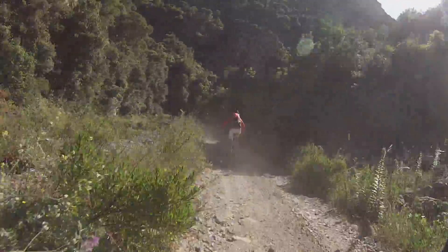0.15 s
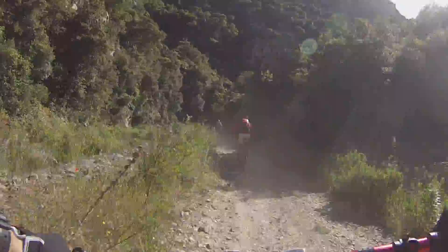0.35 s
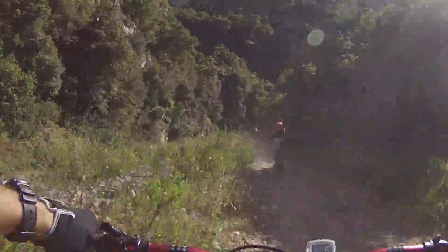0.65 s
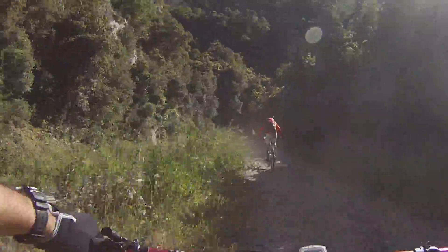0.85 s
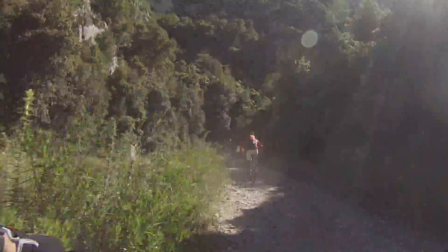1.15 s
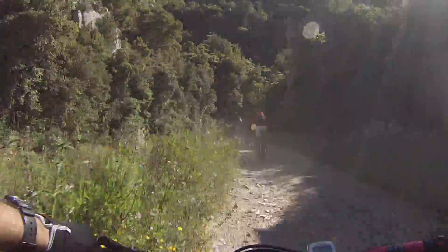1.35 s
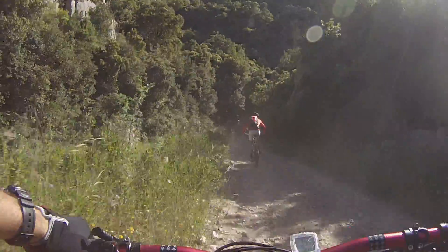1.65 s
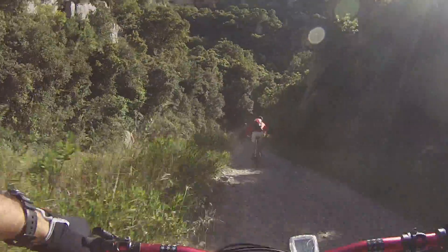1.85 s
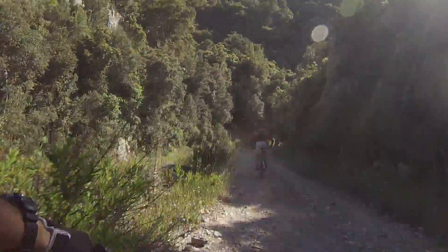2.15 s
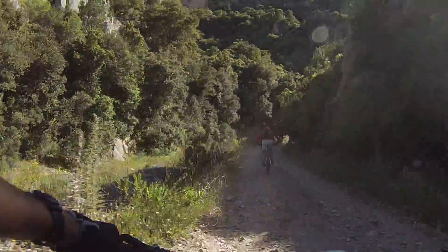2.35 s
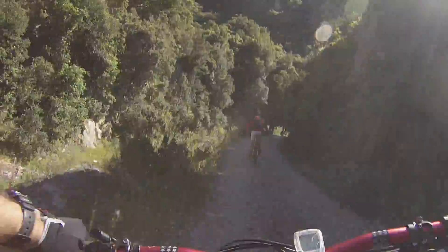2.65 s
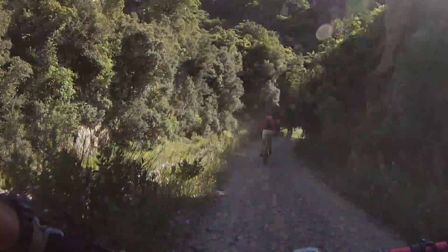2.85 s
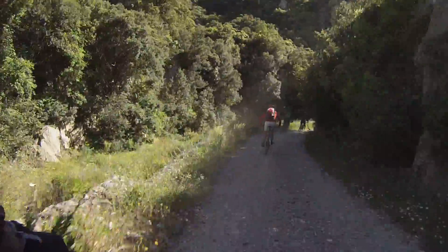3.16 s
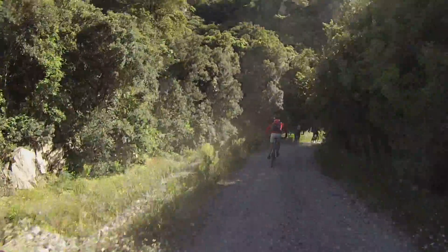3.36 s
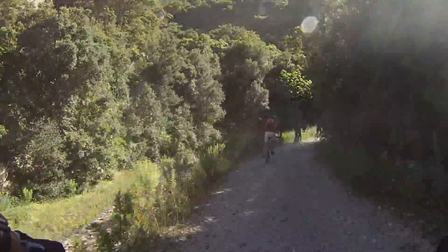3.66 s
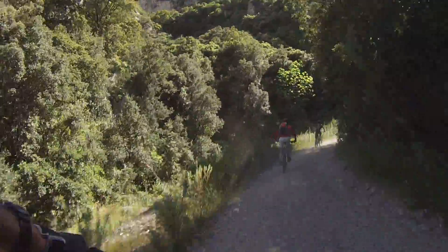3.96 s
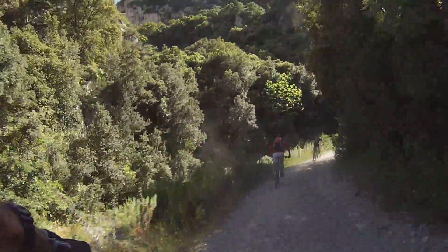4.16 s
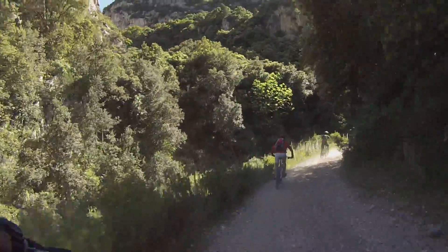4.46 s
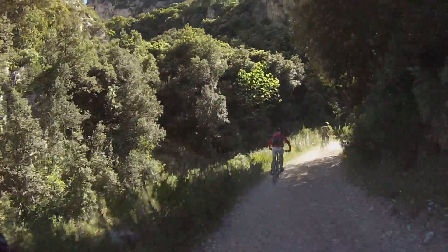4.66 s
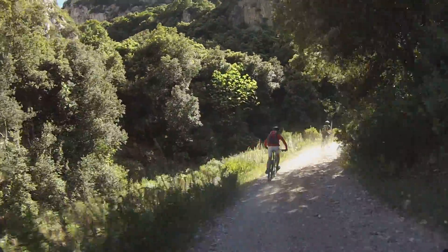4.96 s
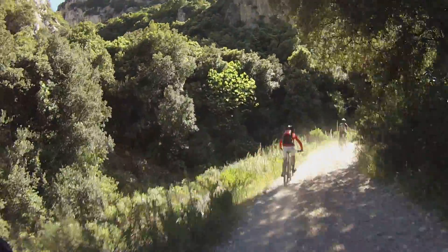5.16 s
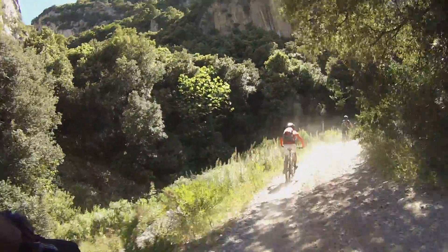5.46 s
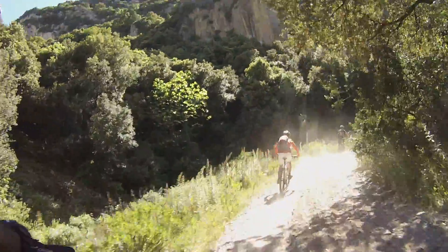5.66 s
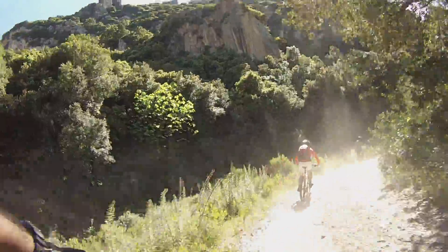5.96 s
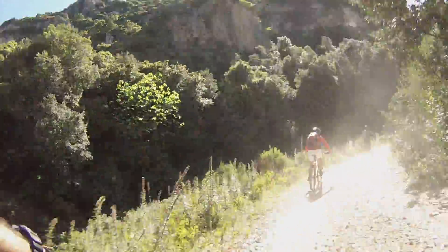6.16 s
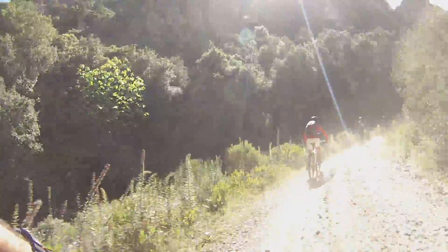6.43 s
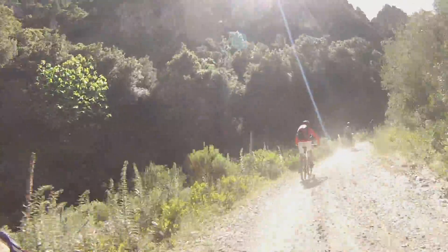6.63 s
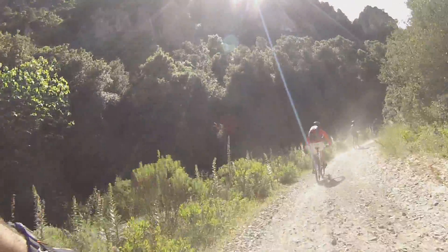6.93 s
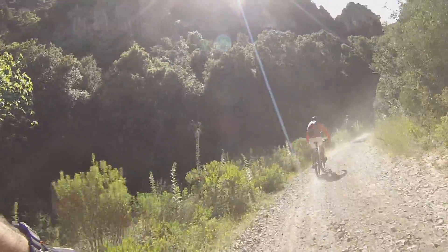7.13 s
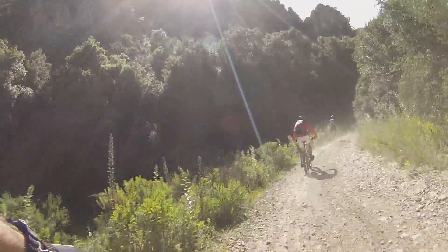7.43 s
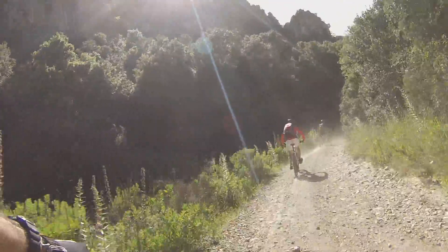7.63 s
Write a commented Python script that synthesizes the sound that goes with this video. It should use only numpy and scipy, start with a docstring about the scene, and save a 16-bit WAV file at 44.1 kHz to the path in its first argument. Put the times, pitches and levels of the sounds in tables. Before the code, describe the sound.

A mountain bike rolls down a dry gravel track for nearly eight seconds, heard in mono by a small, plastic-cased camera on the rider. Tyre crunch is continuous, grainy and boxy, with subdued fine grit on top. Very low wind buffets the microphone in uneven puffs and sudden pressure thuds, heaviest until about 3 s. A hard stone strike lands at 0.3 s and another at 1.05 s with a knock. Rattles and hollow knocks crowd 1.1-2.7 s, then continue around 3-4 s, with a sharp stone click near 4.0 s and a dull thump at 4.6 s. Lighter clicks follow at 5.2-5.4 s. From 6 s the crunch thins, with isolated stone hits at 6.4 and 6.9 s. Wind thuds return near 7.5 s, and a flurry from 7.3 to 7.8 s includes the loudest crack at 7.45 s. Barely audible, thin high chirps pass at 2.85, 5.45 and 6.55 s.

```python
"""Mountain bike on loose gravel

A bike rolls downhill, heard by a small camera in a plastic housing on the rider. Shaped noise makes wind at
the microphone port; hiss and noise grains ring the housing as tyre crunch. Noise bursts through resonances
make rattles, knocks, tyre thumps and stones on the frame; paired falling sines make a thin chirp now and then.
"""
import sys
import numpy as np
from scipy import signal
from scipy.fft import rfft, irfft, next_fast_len
from scipy.io import wavfile
from scipy.ndimage import uniform_filter1d

SR = 44100
rng = np.random.default_rng(int(sys.argv[2]) if len(sys.argv) > 2 else 0)


def to_wav(s):
    """Save 16-bit WAV."""
    ch = np.atleast_2d(s).T  # columns
    pcm = np.round(np.clip(ch, -1, 1) * 32767)  # PCM
    wavfile.write(sys.argv[1], SR, pcm.astype(np.int16))


N = 343539
BLOCK = 2 ** 12  # samples given to one blow, and to each side of a pressure drop

# wind on the port, before flicker: t/s, buffet level/dB, rumble level/dB
WIND_CURVE = [(0.0, -37, -37), (0.04, -20.5, -45.5), (0.15, -42, -41), (0.19, -23, -36),
              (0.43, -33.5, -44.5), (0.54, -18.5, -42), (0.82, -33.5, -42), (0.86, -23.5, -43),
              (1.04, -33.5, -41.5), (1.17, -24.5, -38.5), (1.32, -27, -45), (1.36, -38, -38.5),
              (1.43, -26.5, -38.5), (1.67, -30, -36.5), (1.73, -27, -42.5), (1.99, -27, -38),
              (2.01, -24.5, -29), (2.1, -30, -46.5), (2.29, -23.5, -40), (2.38, -37, -45),
              (2.44, -25.5, -36.5), (2.68, -26.5, -37), (2.75, -30, -45), (2.83, -28, -41.5),
              (3.31, -26, -39), (3.33, -35.5, -35), (3.59, -26, -41), (3.79, -38, -47), (4.05, -27, -41),
              (4.37, -35, -41.5), (4.65, -27.5, -41), (4.76, -35, -45), (5.13, -32.5, -44),
              (5.22, -25.5, -47), (5.28, -38.5, -41.5), (5.41, -23, -38.5), (5.52, -33, -41),
              (5.6, -25, -42.5), (5.97, -34, -46.5), (7.12, -40.5, -45.5), (7.51, -26, -46.5),
              (7.57, -43, -44.5), (7.64, -25.5, -47.5), (7.77, -34.5, -43)]
# spectral shape of the slow pressure swings: f/Hz, relative level/dB
BUFFET_COLOUR = [(4.7, -31), (8, 9), (14, 1), (26, 2.5), (45, -17), (70, -33), (130, -91)]
# spectral shape of the small eddies: f/Hz, relative level/dB
RUMBLE_COLOUR = [(30, -39), (55, -2), (120, -10), (250, -22.5), (500, -33), (900, -45.5), (1500, -92)]
# sudden pressure drops as an eddy crosses the port: t/s, level of the pointed part/dB
PRESSURE_DROPS = [(0.19, -9), (0.327, -10.5), (0.562, -15), (0.63, -8.5), (1.178, -8.5), (1.641, -12.5),
                  (2.025, -7), (2.291, -12), (2.579, -9), (2.669, -11.5), (3.013, -19), (3.102, -17),
                  (3.291, -14.5), (5.207, -14.5), (5.593, -13.5), (5.667, -13.5), (5.814, -16.5),
                  (7.453, -15), (7.513, -12)]
# tyres on gravel: t/s, crunch level/dB, fine grit level/dB
ROLL_CURVE = [(0.0, -50, -61), (0.11, -44.5, -56.5), (0.28, -46, -56), (0.82, -47, -58.5),
              (1.21, -46.5, -58.5), (1.4, -46.5, -59), (2.27, -47, -58.5), (2.51, -44.5, -55.5),
              (2.68, -46, -56), (2.88, -46.5, -58.5), (3.24, -44, -56), (3.48, -45, -57.5),
              (3.81, -48, -60), (4.09, -45, -57), (4.28, -47.5, -59), (4.65, -45, -57), (4.85, -46, -58.5),
              (5.13, -47.5, -58.5), (5.45, -44.5, -57.5), (5.6, -47, -57.5), (5.91, -48.5, -58.5),
              (6.19, -51, -60.5), (7.23, -51.5, -60.5), (7.77, -49, -61)]
# grain sizes: centre f/Hz, mean strikes/s, level before the band filter/dB
GRAIN_SIZES = [(354, 90, -6), (725, 120, -11), (1230, 250, -4.5), (1500, 260, -4.5), (2060, 220, -5),
               (2300, 280, -9.5), (2760, 280, -3.5), (3900, 330, -8), (5600, 240, -9), (8100, 280, -6.5),
               (12000, 100, -18)]
# broad colour of the housing: f/Hz, gain/dB
SHELL_COLOUR = [(60, -21), (150, -2), (300, -4), (550, -0.5), (800, -5.5), (1100, -4.5), (1900, -8),
                (2800, -19), (3300, -20), (4500, -23), (6000, -27), (9000, -30), (12000, -37.5),
                (13500, -39), (15000, -44)]
# housing resonances, added as power to the broad colour: f/Hz, width/Hz, gain/dB
HOUSING_RINGS = [(1263, 49, 5), (1524, 197, 2.5), (2123, 91, -1), (2336, 286, 1.5), (2717, 125, -8),
                 (3580, 890, -16.5), (5010, 30, -12), (5205, 65, -10.5), (5390, 540, -21.5),
                 (6660, 220, -27), (11370, 580, -33)]
# sprays of grit and chain rattle: t/s, peak level/dB, centre f/Hz, decay constant/ms
RATTLE_EVENTS = [(0.1367, -41.5, 5100, 11), (0.422, -45, 5040, 5), (0.4346, -39, 6000, 4.6),
                 (0.775, -54, 5220, 5), (1.222, -38, 4200, 5.5), (1.2695, -34, 4980, 5.4),
                 (1.2838, -36, 5160, 3.1), (1.7974, -39.5, 4600, 4.3), (1.9169, -41, 4970, 10),
                 (2.255, -42, 5440, 5), (2.562, -32, 4000, 5.2), (2.604, -40, 4200, 5),
                 (2.6543, -37, 4150, 5.6), (2.666, -35, 5570, 8.8), (2.7641, -44, 5240, 4.6),
                 (3.072, -40, 5500, 5.4), (3.0894, -40, 5210, 7), (3.4033, -39, 5260, 5.1),
                 (4.2305, -43, 3780, 5.9), (5.19, -41.5, 5300, 5.4), (5.971, -41, 3670, 6.1),
                 (6.076, -44, 4100, 5.6), (6.25, -44, 3880, 2.8), (6.252, -47, 7440, 3.3),
                 (7.3935, -42, 7400, 3), (7.6214, -57, 7900, 2), (7.7054, -52, 7800, 2),
                 (7.755, -35, 5500, 6.8)]
# soft knocks through the mount: t/s, peak level/dB, centre f/Hz, contact decay/ms
KNOCK_EVENTS = [(0.176, -35, 2340, 5.1), (0.539, -36, 1510, 3.5), (0.9583, -33.5, 1390, 4.3),
                (1.0703, -26, 2240, 2.6), (1.085, -35, 1220, 7.9), (1.156, -33, 1260, 4.2),
                (1.6795, -32.5, 2260, 2.8), (1.918, -35.5, 1150, 14), (2.172, -36, 2270, 6.8),
                (2.272, -27, 1480, 12), (2.298, -36, 2250, 4.3), (2.336, -36, 970, 7.5),
                 (2.428, -31.5, 1960, 2.9), (2.524, -35.5, 2280, 4), (2.56, -28, 1580, 4.2),
                (2.627, -38, 2550, 4), (2.666, -32.5, 1530, 3.4), (2.679, -32.5, 1190, 3.5),
                (2.9483, -32, 1210, 6), (3.267, -33, 1430, 13), (3.277, -34, 2250, 2.5),
                (3.292, -28.5, 2280, 1.4), (3.311, -31.5, 1490, 7.7), (3.7442, -31, 2190, 4.5),
                (3.822, -30.5, 1260, 3), (3.8774, -36, 2320, 2.7), (3.912, -33, 1600, 3),
                (3.9465, -34, 1470, 4), (4.0585, -26, 1580, 2.8), (4.582, -33, 2210, 4),
                (5.005, -34.5, 2310, 3), (5.832, -34.5, 2420, 6.9), (5.865, -39, 2350, 4),
                (6.195, -37, 2400, 4), (6.221, -38, 1500, 4.9), (6.464, -38, 1420, 3.4),
                (7.393, -33.5, 1330, 2.9), (7.397, -42, 2300, 2.8), (7.427, -52, 1520, 3.1),
                (7.4795, -31, 2300, 1.6), (7.487, -37, 1490, 3.9), (7.59, -36, 2350, 4.2),
                (7.6944, -37, 2330, 3.3), (7.7203, -38.5, 2430, 2.5), (7.778, -35, 2300, 3.3)]
# the tyre thumps over larger stones: t/s, peak level/dB, centre f/Hz, contact decay/ms
THUMP_EVENTS = [(0.208, -44, 256, 3.2), (0.9583, -28, 750, 2.5), (1.076, -32, 400, 9.9),
                (1.155, -38, 328, 4.4), (1.474, -38, 250, 4), (1.739, -41, 250, 4.2),
                (1.915, -41, 328, 5.1), (2.011, -39, 220, 3.5), (2.272, -37.5, 520, 4.7),
                (2.535, -38, 288, 4), (2.6, -40, 272, 3.7), (3.375, -39, 330, 5.3), (3.428, -38, 264, 3.7),
                (3.823, -30, 386, 3.5), (3.913, -39, 277, 5.8), (4.601, -32.5, 318, 4.5),
                (6.402, -40, 400, 2.6), (7.447, -33, 330, 2.5)]
# stones that strike the frame:
# t/s, ring peak level/dB, crack against the ring/dB, tilt/dB per octave, contact decay/ms, most driven f/Hz
STONE_EVENTS = [(0.2696, -12, -20.5, 4.5, 0.26, 1830), (0.6604, -28, -13.5, 0, 0.31, 3300),
                (1.0513, -16, -19, 1, 0.12, 2420), (1.27, -33, -17, -5, 0.35, 2400),
                (2.355, -28.5, -9, -2, 2.1, 3340), (3.1, -37, -15, 3, 0.6, 3300),
                (3.503, -25.5, -21, 0, 1.5, 2190), (3.6311, -27.5, -16, 1, 0.21, 2380),
                (3.9896, -20.5, -13, 8, 0.36, 2090), (5.182, -30, -14, 1, 0.6, 2200),
                (5.373, -30, -14, -6, 1, 2300), (6.071, -32, -14, 0, 3.1, 3260),
                (6.4037, -25, -20, 2, 0.78, 1930), (6.89, -25, -16, 6, 0.49, 2200),
                (7.2872, -28.5, -15, 10, 0.62, 2160), (7.388, -25, -17, 9, 0.2, 3280),
                (7.4466, -7.5, -15.5, 3, 0.8, 1910), (7.5551, -25, -15.5, 1, 0.51, 2260),
                (7.641, -29.5, -13, -5, 0.35, 1500), (7.646, -25.5, -17, 4, 0.5, 2390),
                (7.675, -33, -12, 8, 0.35, 2300)]
# modes the stones ring, before the ring and crack filters: f/Hz, relative level/dB, t60/s
FRAME_MODES = [(1453, 1, 0.015), (2015, -1.5, 0.021), (2347, 2.5, 0.015), (2724, -0.5, 0.015),
               (3020, -2.5, 0.017), (3430, 0, 0.013), (4100, 12, 0.015), (4680, 2.5, 0.033),
               (5230, 4.5, 0.016), (7240, 3, 0.009), (8100, -1.5, 0.011), (9240, -6, 0.0076),
               (11080, 1.5, 0.0047), (13200, -8, 0.0033)]
# onsets of the two-tone chirps: t/s
CHIRP_TIMES = [2.846, 5.445, 6.54]

BUFFET_FLICKER_DB, RUMBLE_FLICKER_DB = 0.76, 1.2  # quick random gusts around the curve
DROP_S = 0.022  # time scale of a pressure drop
TICKS_PER_S, TICK_DB, TICK_S = 70, -7.5, 0.0013  # base rate, level before the band filter, decay constant
RING_SWAY, TREBLE_SWAY = 0.024, 0.0032  # share by which low and high resonances shift, each way
CRACK_LAG_S = .0008  # the high modes speak after the first soft push
CHIRP_S, CHIRP_DB, CHIRP_HZ = .038, -70.5, (10400, 11080)  # length, peak of each partial, starting pitches
CHIRP_FALL = .015  # share of its pitch that a chirp loses
TOP_HZ = 15300  # upper edge of the camera's passband


def undb(db):
    """Gain of a level in dB."""
    return 10 ** (np.asarray(db) / 20)


def level(x, db):
    """Scale to an rms level in dB."""
    return x * undb(db) / np.sqrt(np.mean(x ** 2))


def columns(table):
    """Curve columns, one value per sample."""
    s, *cols = np.transpose(table)
    return [np.interp(np.arange(N) / SR, s, c) for c in cols]


def colour(points, size):
    """Gain on the bins of a transform, from (f/Hz, dB) points joined on a log frequency axis."""
    hz, db = np.transpose(points)
    return undb(np.interp(np.log(np.fft.rfftfreq(size, 1 / SR) + 1), np.log(hz), db))


def band(hz, centre, q):
    """Response of one resonance, gain 1 at its centre."""
    return 1 / (1 + 1j * q * (hz / centre - centre / hz))


def housing(size, pitch=1.):
    """Causal response of the housing: broad colour with the resonances on top."""
    hz = np.fft.rfftfreq(size, 1 / SR)
    power = colour(SHELL_COLOUR, size) ** 2
    for f, width, db in HOUSING_RINGS:
        power = power + undb(2 * db) / (1 + (2 * (hz - f * pitch) / width) ** 2) ** 2
    # folding the cepstrum forward gives minimum phase: nothing sounds before the blow
    cepstrum = irfft(np.log(power) / 2, size)
    cepstrum[1:size // 2] *= 2
    cepstrum[size // 2 + 1:] = 0
    return np.exp(rfft(cepstrum))


def walk(rate):
    """Random levels held 1 / rate s and slewed twice, without slow drift; spread near 1."""
    hold, levels = int(SR / rate), rng.standard_normal(size=500)
    steps = levels[np.arange(N) // hold % len(levels)]
    slewed = uniform_filter1d(uniform_filter1d(steps, hold), hold)
    return 1.55 * (slewed - uniform_filter1d(slewed, int(.35 * SR)))


def even(x, span_s):
    """Noise with its slower swells divided out, rms near 1."""
    span = int(span_s * SR)
    power = uniform_filter1d(uniform_filter1d(x ** 2, span), span)
    return x / np.sqrt(power + 1e-12)


def coloured_noise(points):
    """Random noise with the spectral shape of the points."""
    size = next_fast_len(N)
    return irfft(rfft(rng.standard_normal(size)) * colour(points, size), size)[:N]


def decaying(strikes, decay_s):
    """Let every strike die away exponentially."""
    return signal.lfilter([1], [1, -np.exp(-1 / (decay_s * SR))], strikes)


def blows(rows, touch=0., debris_db=-30):
    """Rows (t/s, contact/ms, parts): a decaying burst sent through its (peak dB, response) parts."""
    out, t = np.zeros(N + BLOCK), np.arange(BLOCK) / SR
    noise = rng.standard_normal((len(rows), BLOCK))
    # a hard first touch, and loose bits that settle afterwards
    noise[:, 0] += touch
    debris = undb(debris_db) * np.exp(-t / 0.014)
    for (s, ms, parts), burst in zip(rows, noise):
        contact = np.exp(-t * 1000 / max(ms, .05))
        blow = rfft(burst * (contact + debris))
        for db, response in parts:
            sound = irfft(blow * response, BLOCK)
            out[int(s * SR):][:BLOCK] += undb(db) * sound / np.abs(sound).max()
    return out[:N]


def wind():
    """Slow pressure swings with sharp drops and, above them, the puffing rumble of small eddies."""
    buffet_db, rumble_db = columns(WIND_CURVE)
    swing = even(coloured_noise(BUFFET_COLOUR), 0.043)
    eddies = even(coloured_noise(RUMBLE_COLOUR), 0.12)
    # suction is sharper than push
    swing = swing - 0.065 * (swing ** 2 - 1)
    out = undb(buffet_db + BUFFET_FLICKER_DB * walk(9)) * swing
    out += undb(rumble_db + RUMBLE_FLICKER_DB * walk(22)) * eddies
    # a pointed dip between two shallow swells of equal area
    t = np.arange(-BLOCK, BLOCK) / SR / DROP_S
    swells = np.exp(-(t / 1.8) ** 2) * 2 / 1.6 / (1.8 * np.sqrt(np.pi))
    dip = np.exp(-1.6 * np.abs(t)) - swells
    for s, drop_db in PRESSURE_DROPS:
        out[int(s * SR) - BLOCK:][:2 * BLOCK] -= undb(drop_db) * dip
    return out


def swayed(spectrum, size, share, blend):
    """Crossfade between a flat and a sharp housing, so its resonances seem to wander as it shakes."""
    flat, sharp = (irfft(spectrum * housing(size, 1 + k * share), size)[:N] for k in (-1, 1))
    return np.cos(blend) * flat + np.sin(blend) * sharp


def gravel():
    """A hiss of crushed grit, scraping grains of every size and small ticks, through the housing."""
    crunch_db, fine_db = columns(ROLL_CURVE)
    size = 2 * next_fast_len(N // 2 + BLOCK)
    hz = np.fft.rfftfreq(size, 1 / SR) + 1
    hiss = undb(0.74 * walk(14)) * rng.standard_normal(N)
    spectrum = rfft(level(hiss, -5.0), size)

    clumps_db = 1.17 * walk(11)  # clustering shared by all sizes
    for centre, rate, db in GRAIN_SIZES:
        strikes = (rng.random(N) < rate / SR) * undb(7.5 * np.minimum(rng.exponential(size=N), 1.9))
        # larger grains scrape longer, and they come in clusters
        scrape = decaying(strikes, 0.0035 + 2.6 / centre)
        scrape = scrape * undb(clumps_db + 1.83 * walk(12)) * rng.standard_normal(N)
        spectrum = spectrum + rfft(level(scrape, db), size) * band(hz, centre, 2.05)

    # small stones tick over a broad range
    ticks = rng.random(N) < TICKS_PER_S / SR * undb(4 * walk(5))
    ticks = ticks * undb(6.2 * np.minimum(rng.exponential(size=N), 2.2))
    ticks = decaying(ticks, TICK_S) * rng.standard_normal(N)
    spectrum = spectrum + rfft(level(ticks, TICK_DB), size) * band(hz, 3200, 0.72)

    # crunch and fine grit part at 3200 Hz
    treble = 1 / (1 + (3200 / hz) ** 8)
    blend = np.pi / 4 * (1 + np.tanh(0.84 * walk(11)))
    crunch = swayed(spectrum * (1 - treble), size, RING_SWAY, blend)
    fine = swayed(spectrum * treble, size, TREBLE_SWAY, blend)
    return undb(crunch_db) * level(crunch, 0) + undb(fine_db) * level(fine, 0)


def rattles():
    """Bright, scattered bursts that ring the upper housing resonances."""
    hz = np.fft.rfftfreq(BLOCK, 1 / SR) + 1
    upper = housing(BLOCK) ** 1.11 / (1 + 2600 / (1j * hz)) ** 4
    return blows([(s, ms, [(db, upper * band(hz, f, 1.37) ** 2)]) for s, db, f, ms in RATTLE_EVENTS])


def knocks():
    """Rounded blows ring the housing near their centre."""
    hz = np.fft.rfftfreq(BLOCK, 1 / SR) + 1
    body = housing(BLOCK) ** 1.08
    rows = [(s, ms, [(db, body * band(hz, f, 1.8) ** 2)]) for s, db, f, ms in KNOCK_EVENTS]
    return blows(rows, touch=5.6)


def thumps():
    """Dull, compact blows of the tyre carcass."""
    hz = np.fft.rfftfreq(BLOCK, 1 / SR) + 1
    rows = [(s, ms, [(db, band(hz, f, 0.71) ** 2)]) for s, db, f, ms in THUMP_EVENTS]
    return blows(rows, touch=6.0)


def stones():
    """Hard, brief contacts: the low frame modes ring, the high ones crack."""
    t, hz = np.arange(BLOCK) / SR, np.fft.rfftfreq(BLOCK, 1 / SR) + 1
    ring = crack = 0
    for k, (f, db, t60) in enumerate(FRAME_MODES):
        decay = np.exp(-np.log(1000) * t / t60)
        # neighbouring modes have opposite sign
        mode = (-1) ** k * rfft(undb(db) * np.sin(2 * np.pi * f * t) * decay)
        if f < 3700:
            ring = ring + mode
        else:
            crack = crack + mode
    # a small stone cannot drive the bass, and the low modes carry no treble
    bass = 1200 / (1j * hz)
    ring = ring / (1 + 0.92 * bass + bass ** 2) ** 2 / (1 + 1j * hz / 3600) ** 3
    lag = np.exp(-2j * np.pi * hz * CRACK_LAG_S)
    crack = crack * lag / (1 + 3400 / (1j * hz)) ** 2
    octaves = np.log2(np.clip(hz, 1000, 3800) / 2000)
    rows = []
    for s, db, crack_db, tilt_db, ms, f in STONE_EVENTS:
        driven = ring * (1 + 1.1 * band(hz, f, 12)) * undb(tilt_db * octaves)
        rows.append((s, ms, [(db, driven), (db + crack_db, crack)]))
    return blows(rows, touch=7.6, debris_db=-22)


def chirps():
    """Short whistles of two sine partials that fall a little together."""
    out, t = np.zeros(N), np.arange(int(CHIRP_S * SR)) / SR
    bend = t - CHIRP_FALL * t ** 2 / CHIRP_S / 2  # time slows, so the pitch falls
    swell = np.sqrt(np.sin(np.pi * t / CHIRP_S))
    tones = undb(CHIRP_DB) * swell * sum(np.sin(2 * np.pi * f * bend) for f in CHIRP_HZ)
    for s in CHIRP_TIMES:
        out[int(s * SR):][:len(t)] += tones
    return out


def scene():
    """All sources at the one microphone."""
    return (wind() + gravel() + rattles() + knocks() + thumps() + stones() + chirps())[None]


def record(dry):
    """The camera cuts the top with a steep elliptic low-pass."""
    return signal.sosfilt(signal.ellip(10, .2, 70, TOP_HZ, fs=SR, output="sos"), dry)


dry = scene()
out = record(dry)
to_wav(out)
```